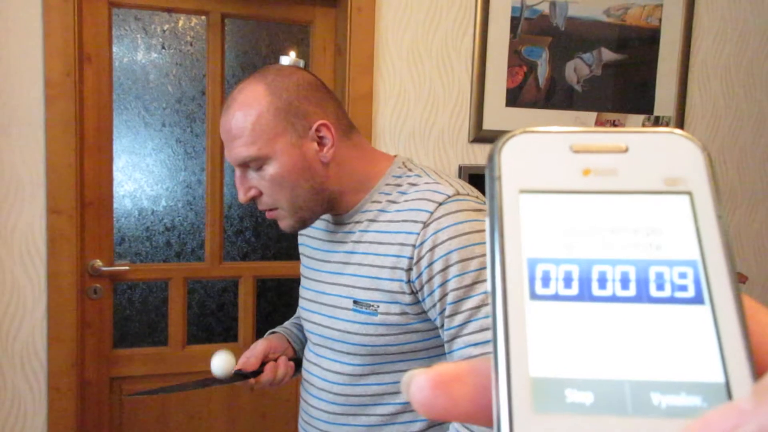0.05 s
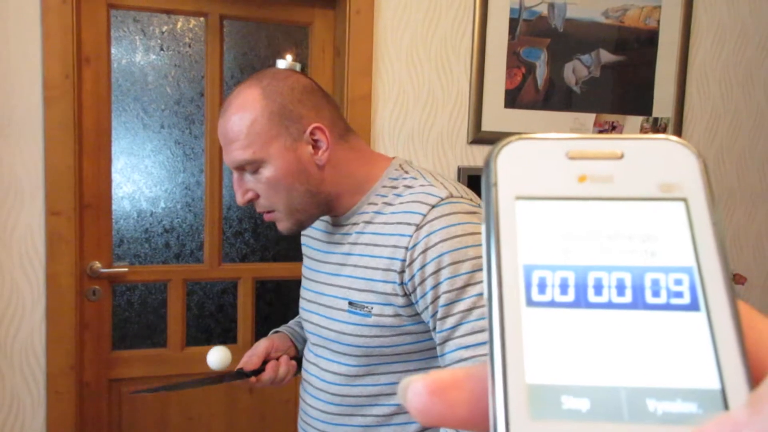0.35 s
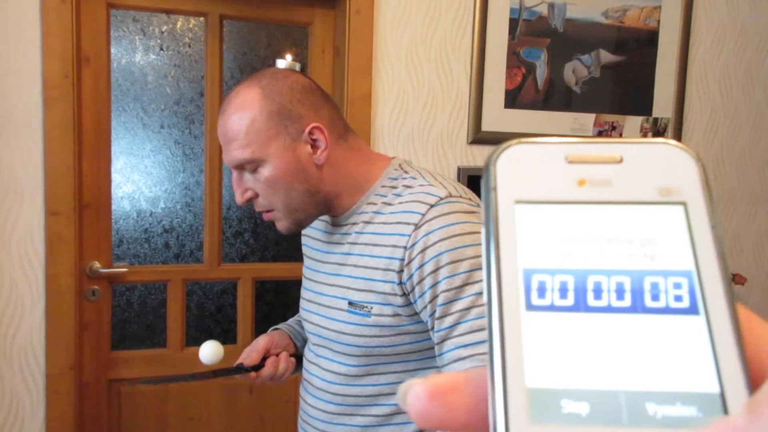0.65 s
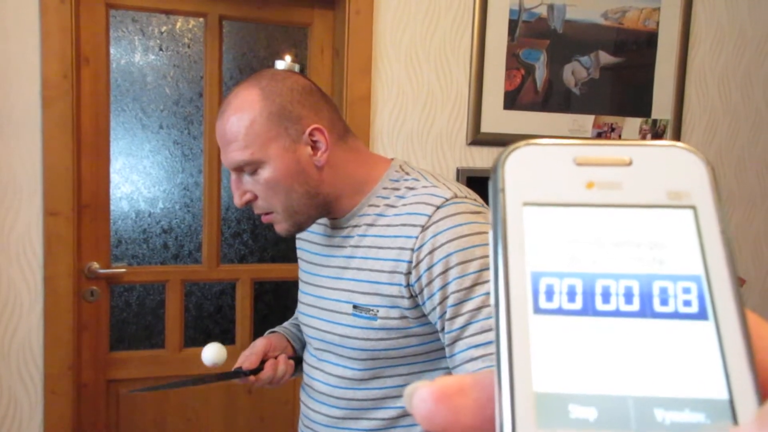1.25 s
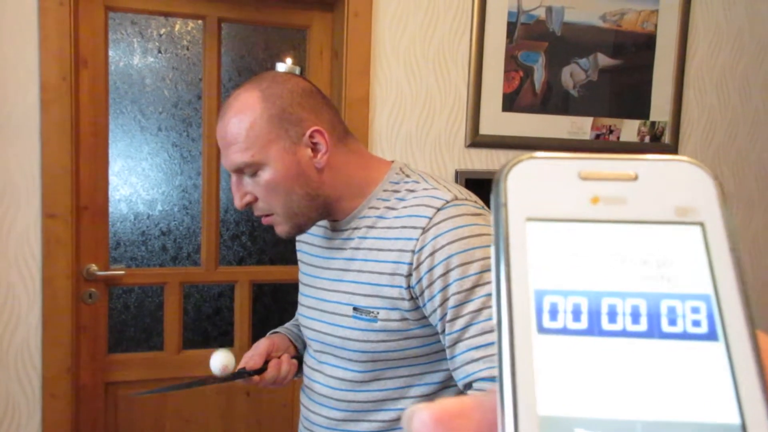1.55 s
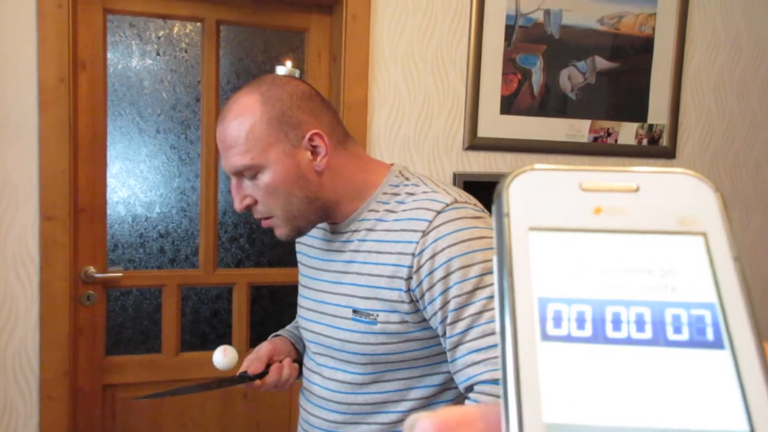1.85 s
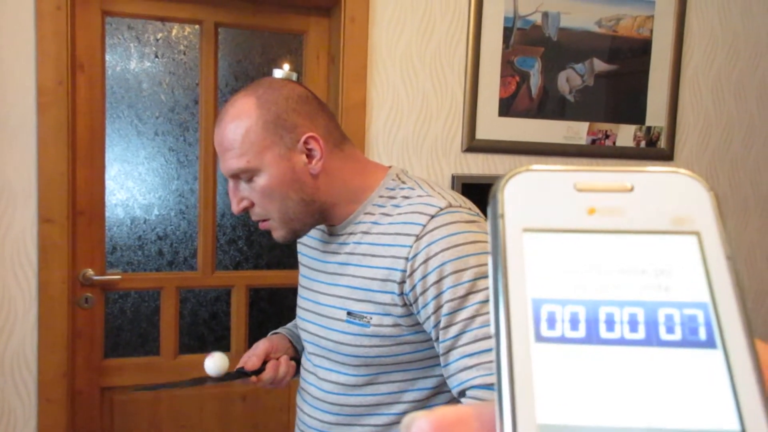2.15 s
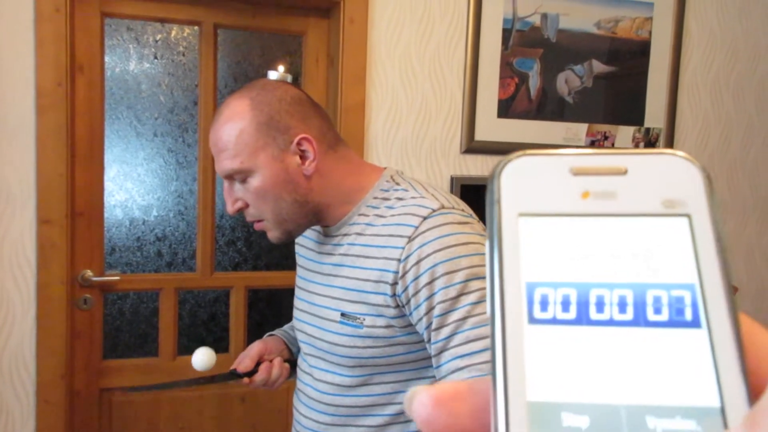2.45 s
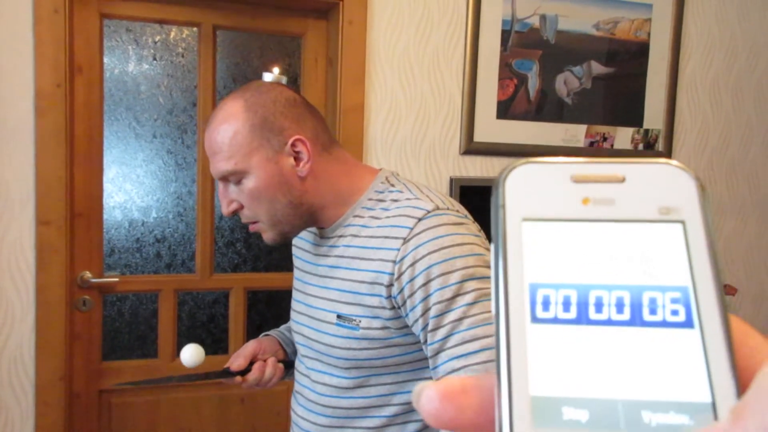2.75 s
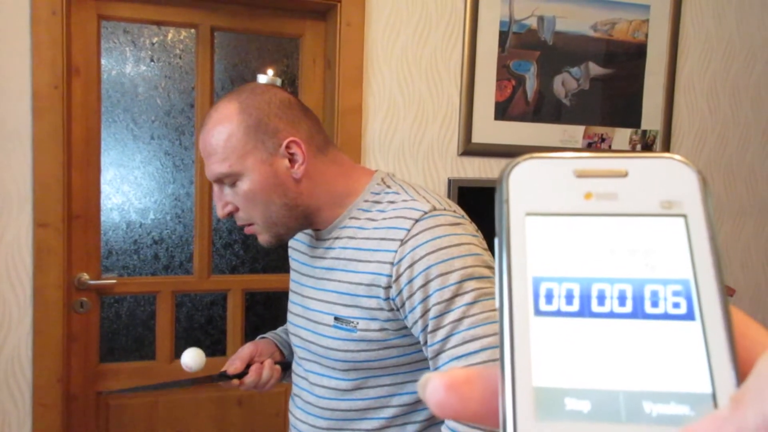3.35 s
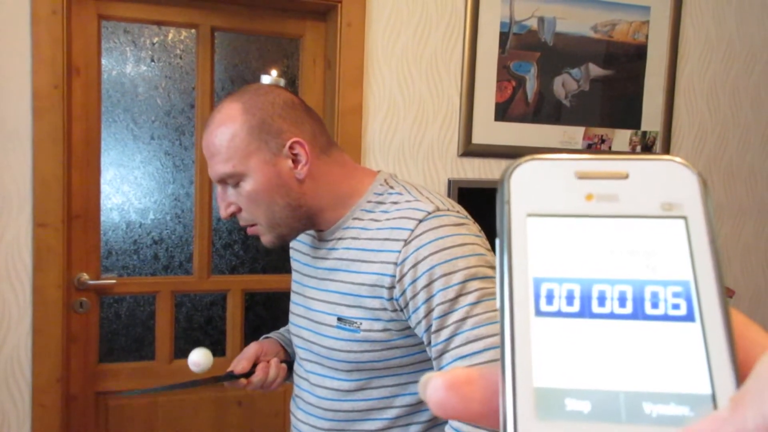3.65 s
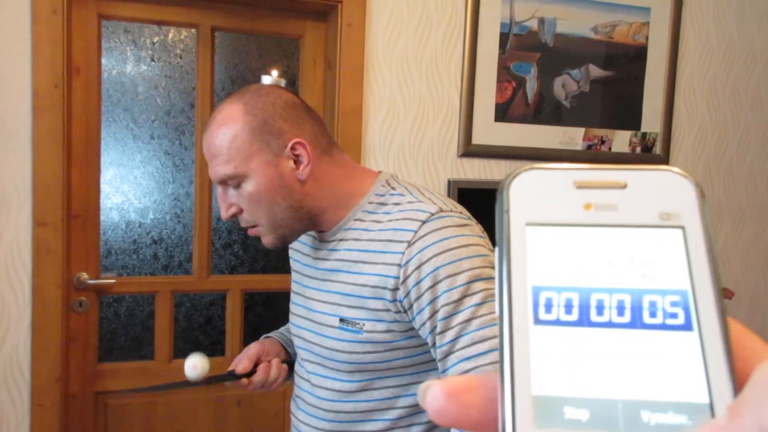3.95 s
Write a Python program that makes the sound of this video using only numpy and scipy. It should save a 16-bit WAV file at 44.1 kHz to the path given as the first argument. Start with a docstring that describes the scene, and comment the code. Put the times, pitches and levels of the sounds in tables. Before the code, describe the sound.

A table-tennis ball taps on the flat of a knife about nine times a second for the whole four seconds. Each tap mixes a small knock, a metallic tick and a bright ping. The taps clack harder around 0.5 seconds, soften, then clack harder again just after 3 seconds. The small room adds short echoes and a soft, steady hush.

```python
"""Quick, light taps, about nine a second: a table-tennis ball bouncing on the flat of a hand-held knife.
Each tap is a low knock, a short clack and tick of the blade and a bright ping of the ball's shell;
their mix depends on where the ball lands. The flat blade sends the knock upwards, so its echo from
the ceiling is stronger than its direct sound. The small room adds wall echoes and a soft, steady hush."""
import sys
import numpy as np
from scipy import signal
from scipy.fft import rfft, irfft, next_fast_len
from scipy.io import wavfile

SR = 44100
rng = np.random.default_rng(int(sys.argv[2]) if len(sys.argv) > 2 else 0)


def log_audio(samples):
    """Write samples as a 16-bit WAV file to the path given in sys.argv[1]."""
    # one column per channel
    frames = np.atleast_2d(samples).T
    # limit to full scale, then quantise
    limited = np.clip(frames, -1, 1)
    pcm = np.round(limited * 32767).astype(np.int16)
    wavfile.write(sys.argv[1], SR, pcm)


N = 176400
TAP_SAMPLES, ECHO_SAMPLES = 1024, SR // 2
BLADE_SCATTER, BALL_SCATTER = 0.14, 0.23  # random shift of each tone's wave [cycles]


def knock(db):
    """The ball gives the blade one short push, heard as a low knock."""
    # tone colour of the push: (frequency [Hz], level [dB])
    colour = [(100, -23.5), (225, -28.5), (280, -5), (340, -0.5), (430, -3.5), (560, 1.5), (610, -9.5),
              (700, -3.5), (780, 2.5), (930, -2), (1300, 1.5), (1600, -3), (2050, -21.5), (2550, -4.5),
              (2850, -8), (3200, -7.5), (3500, -6.5), (5000, -19), (6200, -30), (14000, -37)]
    return amp(db + 1) * unit(coloured(signal.unit_impulse(TAP_SAMPLES), colour))


def clack(db):
    """The blade gives a dry clack on a hard landing."""
    # tone colour of the clack: (frequency [Hz], level [dB])
    colour = [(300, -24), (700, -9.5), (1100, -1.5), (1450, 2), (1700, 4.5), (2050, 0.5), (2200, 0),
              (2500, -9), (2850, -18), (3250, -9), (3800, -16), (4600, -27), (5300, -10.5), (6000, -7.5),
              (6600, -17), (7700, -2), (9000, -9.5), (14000, -35.5)]
    return amp(db + 1.5) * unit(coloured(signal.unit_impulse(TAP_SAMPLES), colour))


def tick(hz, db):
    """The steel blade vibrates briefly, heard as a tick."""
    # the blade's tones: (pitch [multiple of hz], level [dB], fade time [s])
    tones = [(.975, 2, 0.0094), (1.045, -4, 0.011), (1.28, -8.5, 0.0095)]
    return amp(db + 1) * unit(struck(tones, TAP_SAMPLES, BLADE_SCATTER, hz))


def ball(ping_hz, ping_db, upper_db, sparkle_hz, sparkle_db):
    """The hollow shell pings for a few milliseconds, with a crack of noise from the contact."""
    # shell tones that shift with the landing spot: (pitch [multiple of ping_hz], level [dB], fade time [s])
    ping_tones = [(.965, -7.5, 0.0062), (1.003, -5.5, 0.01)]
    # shell tones that keep their pitch: (frequency [Hz], level [dB], fade time [s])
    upper_tones = [(9710, -8.5, 0.0081), (9930, -4, 0.0066)]
    # the highest shell tones: (pitch [multiple of sparkle_hz], level [dB], fade time [s])
    sparkle_tones = [(.955, 0.5, 0.0085), (1.01, -1, 0.0066), (1.075, -1.5, 0.0098), (1.16, -9, 0.0071)]
    # tone colour of the contact noise: (frequency [Hz], level [dB])
    crack_colour = [(2000, -15.5), (6000, -24), (8000, 0.5), (12000, -6), (14500, -6.5), (16000, -38)]
    t = np.arange(TAP_SAMPLES) / SR
    burst = rng.standard_normal(TAP_SAMPLES) * fade(t, fade_s=0.01)
    crack = amp(sparkle_db - 1.5) * unit(coloured(burst, crack_colour))
    ping = amp(ping_db) * unit(struck(ping_tones, TAP_SAMPLES, BALL_SCATTER, ping_hz))
    upper = amp(upper_db - 0.5) * unit(struck(upper_tones, TAP_SAMPLES, BALL_SCATTER))
    sparkle = amp(sparkle_db - 1) * unit(struck(sparkle_tones, TAP_SAMPLES, BALL_SCATTER, sparkle_hz))
    return ping + upper + sparkle + crack


def ring(db):
    """Knife, ball and room ring on faintly after a tap."""
    # the lasting tones: (frequency [Hz], level [dB], fade time [s])
    tones = [(301, -15, 0.058), (545, -8, 0.15), (765, -10, 0.17), (842, -23, 0.89), (1025, -10.5, 0.3),
             (1194, -22.5, .45), (1263, -13, 0.38), (1393, -16, 0.28), (1547, -18.5, 1), (1663, -17, 0.34),
             (4200, -12, .3), (3870, -26, 0.24), (5970, -29, 0.45)]
    return amp(db) * struck(tones, ECHO_SAMPLES, BLADE_SCATTER)


def room(sound, delays_s, path_db, tail):
    """A sound arrives directly, as separate echoes and as a blurred tail of echoes."""
    arrivals = np.round(delays_s * SR).astype(int)
    echoes = np.bincount(arrivals, amp(path_db), len(tail))
    return signal.fftconvolve(sound, echoes + tail)[:ECHO_SAMPLES]


def echo_tail():
    """Countless echoes blur into fading noise; the middle pitches last longest."""
    # how long the room rings: (frequency [Hz], fade time [s])
    fade_times = [(150, 0.26), (500, 0.36), (1300, 0.45), (4000, 0.35), (9000, 0.33), (14000, 0.26)]
    hz, t, bands = signal.stft(rng.standard_normal(ECHO_SAMPLES), SR, nperseg=256)
    bands *= fade(t, along(fade_times, hz)[:, None])
    _, tail = signal.istft(bands, SR, nperseg=256)
    tail = np.pad(tail, (int(0.0055 * SR), 0))[:ECHO_SAMPLES]  # starts 5.5 ms late
    return tail / np.linalg.norm(tail)


def drifted(tail, new_share):
    """The echo tail changes as the ball wanders: a share of it is renewed."""
    return np.sqrt(1 - new_share) * tail + np.sqrt(new_share) * echo_tail()


def hush():
    """The room's soft, steady background noise."""
    # tone colour of the noise: (frequency [Hz], level [dB])
    colour = [(25, -13.5), (70, -3), (110, -3.5), (170, 0.5), (400, -2), (1000, -3), (2200, -10.5),
              (4000, -13.5), (6500, -18.5), (10000, -17.5), (15000, -26)]
    return amp(-52.5) * unit(coloured(rng.standard_normal(N), colour))


def struck(tones, samples, scatter, pitch=1):
    """A struck object rings with fading tones, a little different every time."""
    attack_s, spread_db = 0.00015, 1.2
    t = np.arange(samples) / SR
    hz, db, fade_s = np.transpose(tones)[:, :, None]
    db = db + spread_db * rng.standard_normal(hz.shape)
    cycles = pitch * hz * t + scatter * rng.standard_normal(hz.shape)
    waves = amp(db) * fade(t, fade_s) * np.cos(2 * np.pi * cycles)
    return waves.sum(0) * (1 - np.exp(-t / attack_s))


def coloured(sound, colour):
    """Make some frequencies louder and others softer, following (frequency [Hz], level [dB]) points."""
    size = 2 * next_fast_len(len(sound))
    gain = amp(along(colour, np.fft.rfftfreq(size, 1 / SR)))
    # fold the filter forward in time, so that nothing rings before the sound starts
    log_filter = irfft(np.log(gain), size)
    log_filter[1:size // 2] *= 2
    log_filter[size // 2 + 1:] = 0
    return irfft(rfft(sound, size) * np.exp(rfft(log_filter)), size)[:len(sound)]


def along(points, hz):
    """Read between (frequency [Hz], value) points, with octaves evenly spaced."""
    point_hz, values = np.transpose(points)
    return np.interp(np.log(hz + 1), np.log(point_hz + 1), values)


def fade(t, fade_s):
    """Die away by 60 dB in each fade time."""
    return amp(-60 * t / fade_s)


def amp(db):
    """Turn decibels into a multiplier."""
    return 10 ** (np.asarray(db) / 20)


def unit(sound):
    """Scale a sound to an average strength (rms) of 1."""
    return sound / np.sqrt(np.mean(sound ** 2) + 1e-20)


def scene():
    """All the taps with their echoes, over the room's hush."""
    # the ball's landings: (time [s], knock [dB], clack [dB], tick [Hz], tick [dB],
    # ping [Hz], ping [dB], upper ping [dB], sparkle [Hz], sparkle [dB])
    taps = [(-0.02, -35.5, -52, 4070, -40.5, 8400, -33, -38, 11540, -36),
            (0.1274, -35, -45.4, 4320, -39.5, 8940, -38, -42, 11240, -34),
            (0.2255, -37, -51, 4340.0, -44, 8750, -36, -42, 11060, -37.5),
            (0.344, -35.5, -42, 4650, -41, 8260, -35.5, -33.5, 11360, -35.6),
            (0.4532, -37.5, -34.5, 3910, -36, 8900, -32.5, -33.0, 11370, -33.5),
            (0.562, -37.5, -33, 3930, -34, 8430, -29.5, -30, 11590, -36),
            (0.6805, -37.5, -34.5, 3900.0, -36.5, 8700, -33.0, -32, 11140, -33),
            (0.8021, -37.0, -45, 4250, -41, 8820.0, -36.5, -37, 11500, -36),
            (0.9254, -37.5, -58, 3985, -41.5, 8450.0, -41, -42, 11370, -35.5),
            (1.043, -38.5, -57, 3990, -40.5, 8960.0, -36.5, -43, 11330, -36.3),
            (1.1617, -39, -54.9, 3950, -42.5, 9000, -35.5, -42, 11700, -39),
            (1.2668, -39.5, -49.5, 3930, -42, 8980, -41, -39.5, 11550, -37),
            (1.384, -38.5, -55, 3896, -43.3, 8930, -37, -41, 11660, -38.5),
            (1.5136, -38.5, -52, 3920, -43.2, 8830, -36.5, -39, 11400, -39.2),
            (1.6329, -38.5, -51, 3895, -43.5, 8990, -37.5, -40.5, 11200, -40.5),
            (1.7324, -38, -49, 3930, -44.5, 9050, -39, -43.5, 11120, -38),
            (1.8703, -36, -48, 3930, -39.5, 8690, -46, -46.9, 12340, -35),
            (1.9988, -35.8, -41, 4180, -44, 8360, -31.5, -31.5, 11140, -38.7),
            (2.1097, -37, -50, 4180, -41, 8620, -33.5, -39.5, 11520.0, -39),
            (2.2193, -38, -52.0, 3950, -41, 8390, -44, -43, 12050, -35.5),
            (2.3513, -37.5, -53, 4000, -41, 9020, -42, -58, 11080, -38),
            (2.443, -38.5, -56.0, 4100, -44.5, 9000, -49, -51, 11100, -37),
            (2.5485, -37, -55, 4000, -43, 9040, -43, -41, 11050, -35.5),
            (2.6898, -38, -52, 4070, -41.5, 8600, -42.5, -43, 11100, -37),
            (2.775, -38.5, -61, 4070.0, -44.5, 8530, -43, -41, 11570, -36.5),
            (2.8871, -38, -53, 4110.0, -43, 8600, -38, -37, 12200, -36),
            (3.0178, -38.5, -41.5, 4440, -41.5, 8860, -38.0, -46, 11680, -37.5),
            (3.1138, -40.5, -35, 3970, -36.5, 8230, -33, -30.5, 11460, -38),
            (3.2158, -38, -33.5, 3910, -36.5, 8740, -32, -31.5, 11160, -34.5),
            (3.3388, -37, -45.9, 4100, -39, 8520, -31.5, -42, 11550, -36.5),
            (3.4581, -36.5, -45, 4260, -40.5, 8650, -35.2, -40.5, 11300, -38),
            (3.5638, -37, -44, 4260, -41, 8500, -36.5, -43, 11500, -37.5),
            (3.6866, -37.5, -55, 4040, -40.5, 8380, -38.5, -44, 11850, -35),
            (3.8238, -39, -53, 4000, -41, 8600, -46, -47.5, 12040, -35.5),
            (3.9102, -39.6, -53, 3950.0, -43.0, 8540, -38.5, -48.3, 12240, -35.5)]
    # ways to the microphone, direct first, then by ceiling and walls:
    # (delay [s], knock and clack [dB], tick [dB], ball [dB])
    paths = [(0, -11.5, -11, -3.5), (.0049, -6.5, -3.5, -13), (.0073, -14.5, -17.5, -12.5),
             (.009, -19.5, -15, -19.5), (.0113, -19, -15, -40), (.0147, -18, -16.5, -18.5),
             (0.019, -14.5, -14, -21), (0.02, -16, -24, -31), (.0212, -27, -18, -17),
             (0.0336, -15.5, -25, -20), (.0427, -23, -27, -30)]
    delays_s, low_path_db, tick_path_db, ball_path_db = np.transpose(paths)
    lead = 4410  # spare samples for the tap just before time zero
    mix = np.zeros(lead + N + SR)
    low_tail, high_tail = echo_tail(), echo_tail()
    for time_s, knock_db, clack_db, tick_hz, tick_db, *shell_settings in taps:
        low_tail = drifted(low_tail, new_share=0.071)
        high_tail = drifted(high_tail, new_share=0.6)
        low = room(knock(knock_db) + clack(clack_db), delays_s, low_path_db, amp(-3.5) * low_tail)
        steel = room(tick(tick_hz, tick_db), delays_s, tick_path_db, amp(-4.5) * high_tail)
        shell = room(ball(*shell_settings), delays_s, ball_path_db, amp(-4.5) * high_tail)
        start = lead + round(time_s * SR)
        mix[start:start + ECHO_SAMPLES] += low + steel + shell + ring(knock_db)
    return (mix[lead:lead + N] + hush())[None]


def record(dry):
    """The microphone colours the sound, and the very highest treble is cut off."""
    # how strongly the microphone hears each pitch: (frequency [Hz], level [dB])
    colour = [(100, 0), (3000, -1), (4400, -1.5), (4650, -3.5), (5000, 0), (6400, -1), (8500, -2.5),
              (9120, 1), (9370, -11), (9620, 0), (12500, -1), (14500, -3)]
    treble_cut = signal.firwin(255, cutoff=15100, fs=SR)
    return signal.fftconvolve(coloured(dry[0], colour), treble_cut, 'same')[None]


dry = scene()
out = record(dry)
log_audio(out)
```